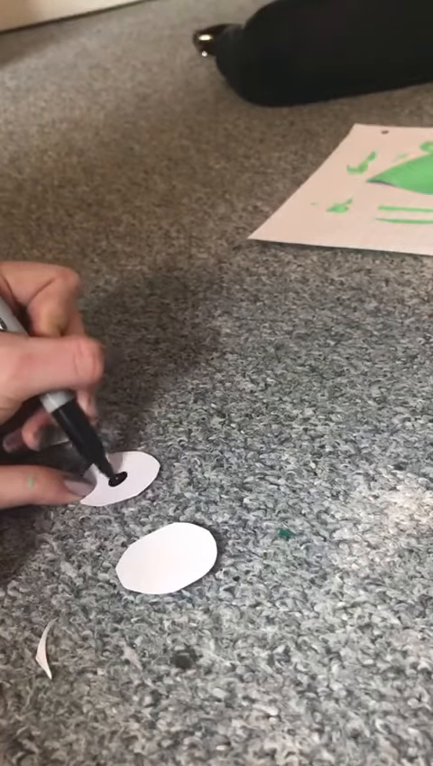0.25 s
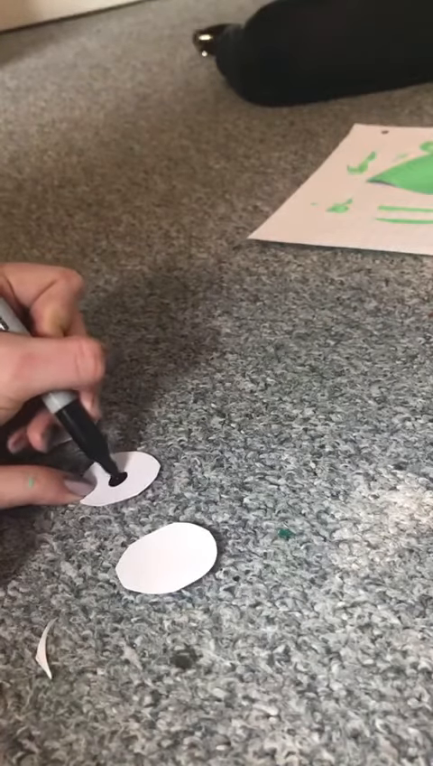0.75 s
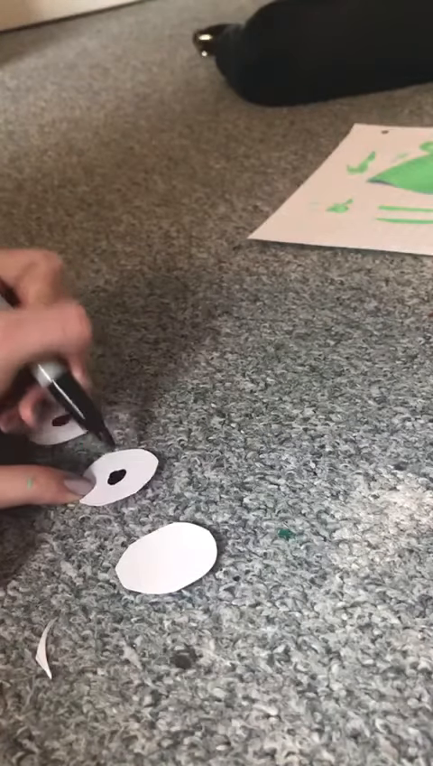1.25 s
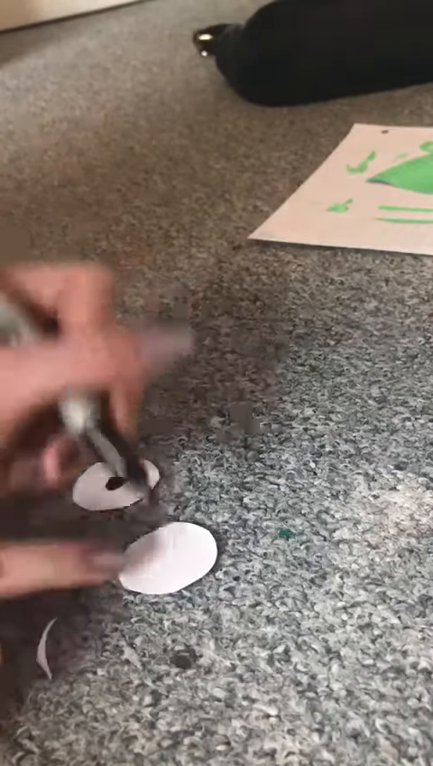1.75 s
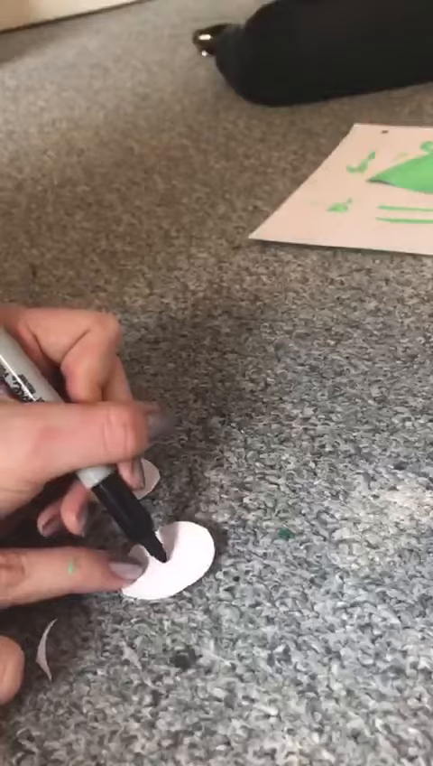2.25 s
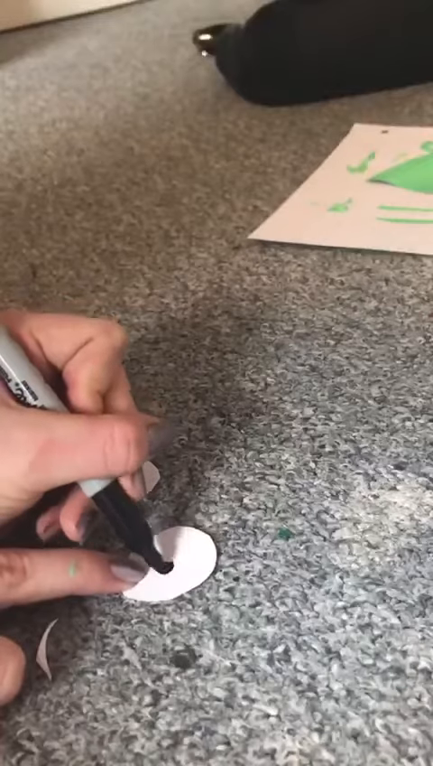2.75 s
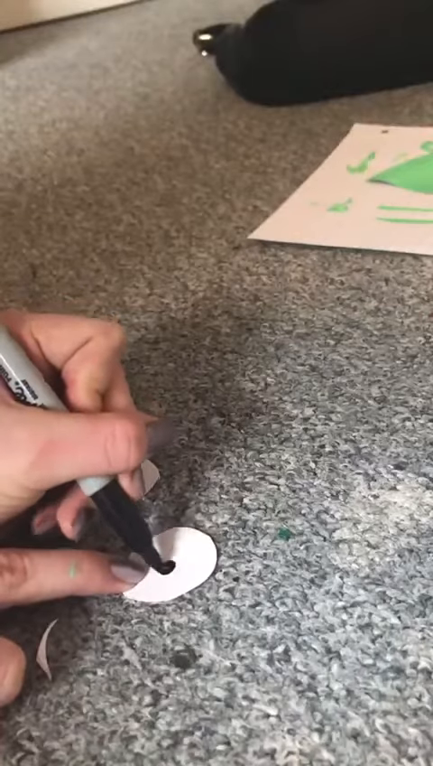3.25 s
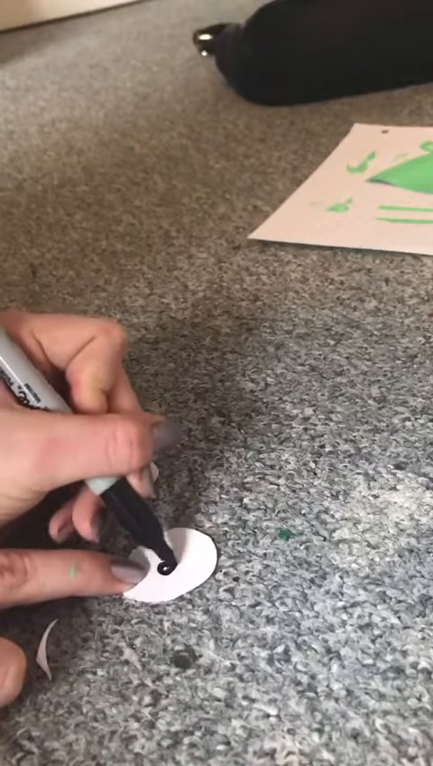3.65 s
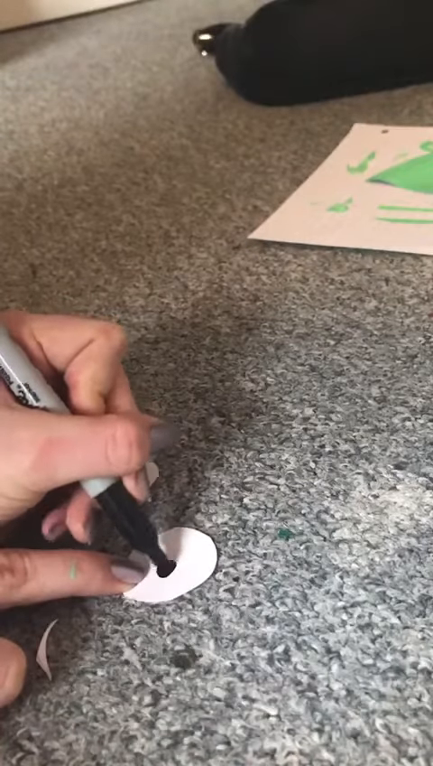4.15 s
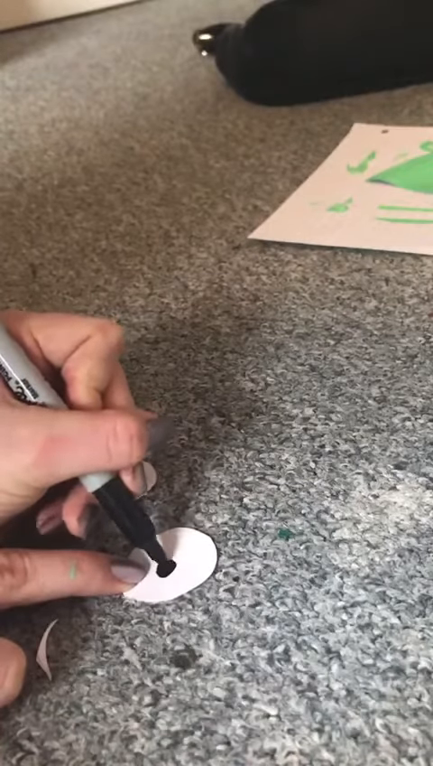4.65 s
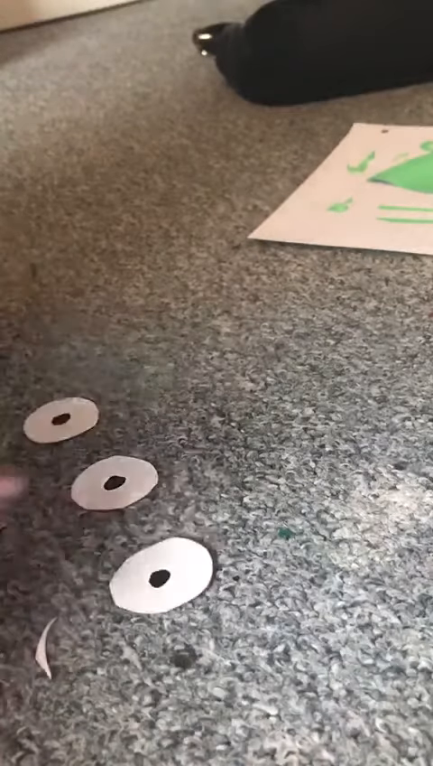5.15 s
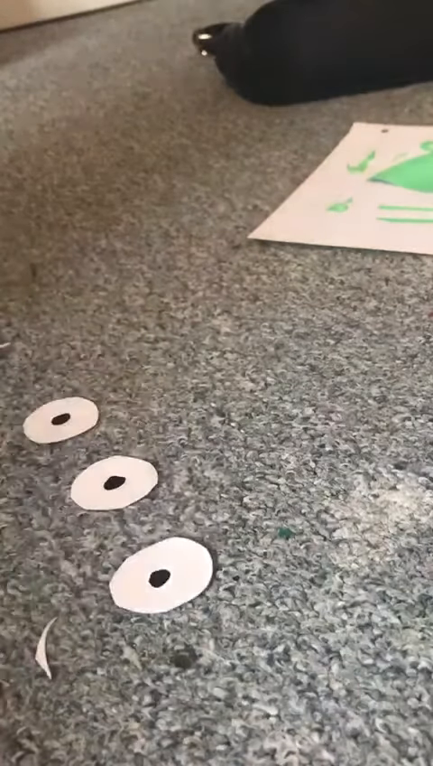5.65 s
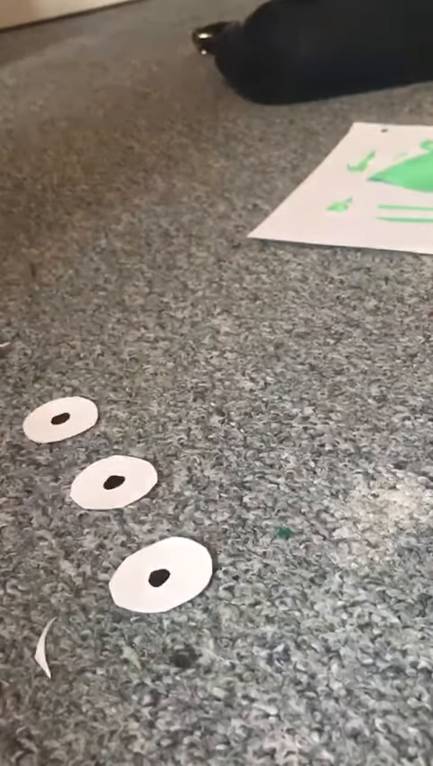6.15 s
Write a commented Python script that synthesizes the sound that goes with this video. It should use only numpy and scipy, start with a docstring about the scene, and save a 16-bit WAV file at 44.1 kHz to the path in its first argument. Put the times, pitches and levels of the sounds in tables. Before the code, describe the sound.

Soft, squeaky-dry marker rubs on small paper circles, a pause, more circular scribbling, then hand rustle and crisp pen clicks in a humming room.

```python
"""Fine, grainy rubs of a felt marker colouring small paper circles: quick flicks and round push-pull loops.
Each stroke swells three layers of fibre snaps (rub, scratch, hiss), whose resonances glide as the pen leans.
The hand brushes the carpet in noisy sweeps, a paper circle slides with a faint whistle, a few soft bumps
sound as damped modes, and plastic clicks near the end ring the pen's hollow and shell.
Mains hum and steady filtered noise fill the small room throughout."""
import sys
import numpy as np
from scipy import signal
from scipy.fft import rfft, irfft, next_fast_len
from scipy.io import wavfile
from scipy.ndimage import uniform_filter1d, map_coordinates

SR = 44100
rng = np.random.default_rng(int(sys.argv[2]) if len(sys.argv) > 2 else 0)


def wav_record(signal):
    """Record a signal, one row per channel, as 16-bit PCM in the file named by sys.argv[1]."""
    frames = np.transpose(np.atleast_2d(signal))
    bounded = np.clip(frames, -1, 1)
    # unit amplitude maps onto the largest positive 16-bit level
    quanta = np.round(bounded * 32767).astype(np.int16)
    wavfile.write(sys.argv[1], SR, quanta)


N = 281784

# Single flicks of the nib. Each row: start in seconds, length in seconds, relative level in dB,
# extra low rub in dB, extra high hiss in dB, direction from 0 = push to 1 = pull.
FLICKS = [(-0.03, 0.057, -56.5, -4, -1.5, 0.8), (0.033, 0.09, -57.5, 1, 4.5, 0.31),
          (0.127, 0.044, -59, -1, 5.5, 0.53), (0.166, 0.083, -59.5, 4.5, -2, 0.83),
          (0.254, 0.08, -57, 2, 4.5, 0), (0.338, 0.11, -60.5, 4, 1.5, 0.93),
          (0.466, 0.036, -59.5, 6.5, 5, 0), (0.509, 0.056, -60.5, 1, 3.5, 0.36),
          (0.575, 0.041, -69.5, 9.5, -2, 0), (0.631, 0.079, -63, 3, 4.5, 0.0085),
          (0.724, 0.033, -61, 3, 5, 0.38), (0.772, 0.049, -61.5, 1.5, -3.5, 0.49),
          (0.842, 0.042, -60, 1.5, 1, 0), (0.907, 0.037, -59.5, -2.5, 4, 0.2),
          (0.952, 0.06, -58, 0, -4, 0.6), (1.023, 0.044, -60, 3.5, -1, 0.32),
          (1.116, 0.024, -67, -2.5, 1.9, 0.43), (2.262, 0.009, -64, -11, -6, 0.88),
          (2.32, 0.055, -64.5, -4, -0.5, 0.33), (2.388, 0.042, -58, -6, -4.2, 0.31),
          (2.434, 0.13, -60.5, -0.5, 3.5, 0.98), (4.447, 0.05, -65, 5, 9, 1),
          (4.516, 0.036, -55.5, -8, 0, 0.3), (4.576, 0.057, -59, 0, 1, 0.1),
          (4.657, 0.027, -54.5, -13, -2, 0.36), (4.746, 0.0033, -61, -7, -4, 0.16)]
# Round loops, a push then a pull. Each row: start in seconds, push length in seconds,
# pull length in seconds, relative push level in dB, relative pull level in dB.
LOOPS = [(2.567, 0.12, 0.13, -56.9, -57.9), (2.807, 0.13, 0.11, -53.5, -57),
         (3.052, 0.13, 0.11, -53.5, -57.5), (3.301, 0.11, 0.13, -52, -55.5), (3.548, 0.12, 0.12, -52, -57),
         (3.793, 0.117, 0.119, -53.5, -56.5), (4.04, 0.094, 0.11, -53.5, -57.5),
         (4.251, 0.1, 0.085, -55.5, -59)]
# How each kind of stroke swells; the rows are rub, scratch, hiss. Each row: level in dB added to the stroke,
# crest as a share of the length, fall to the ends in dB, bluntness (1 = pointed, 3 = flat-topped).
PUSH = [(-5, 0.22, 15, 4.1), (2, 0.74, 9.8, 0.75), (4, 0.23, 9.9, 0.85)]
PULL = [(0, 0.56, 14.3, 2.68), (-2.5, 0.98, 0.76, 2.07), (1.5, 0.22, 7.3, 2.3)]  # columns as in PUSH
FLICK = [(-1.36, 0.81, 5.9, 2.3), (-0.21, 0.67, 3.4, 2.2), (1.24, 0.41, 5, 0.93)]  # columns as in PUSH
# Glide of the resonances as the pen leans; the rows are rub, scratch, hiss.
# Each row: shift at the start in octaves, shift at the end in octaves.
PUSH_LEAN = [(-0.07, 0.02), (-0.03, 0.04), (0.0, -0.01)]
PULL_LEAN = [(0.09, 0.09), (0.14, -0.14), (-0.05, 0.065)]  # columns as in PUSH_LEAN
TOUCH_S, LIFT_S = 0.005, 0.013  # the nib grips and lets go
TURN_S = 0.02  # the pen takes this long to lean the other way
# Colours of the rub and the scratch. Each row: frequency in Hz, relative level in dB.
RUB = [(450, -31), (780, -22.5), (1020, -5.5), (1370, -1), (1650, -7), (2100, -8.5), (2700, -22),
       (4000, -41)]
SCRATCH = [(1500, -20.5), (2400, -11), (2950, -3), (3450, 0), (3900, -3.5), (4800, -8.5), (6000, -15),
           (9000, -34)]
# Each paper circle hisses in its own colour. Each row: frequency in Hz, relative level in dB.
HISS_FIRST = [(3500, -23), (5100, -6), (6000, -8), (7000, -6), (7800, -5), (8750, 1), (9400, -5),
              (10200, -12), (11250, -4), (11900, -12.5), (12500, -25)]
HISS_SECOND = [(3500, -32), (5300, -7), (6400, -1.5), (7000, -2), (7650, -4.5), (8750, 2), (9500, -2.5),
               (10400, -9.5), (11250, -1), (11900, -11.5), (12500, -14)]
SECOND_CIRCLE_S = 1.7  # from here on the hiss takes the second colour
# Sweeps of hand and sleeve over the carpet. Each row: start in seconds, length in seconds,
# dull level in dB, bright level in dB.
SWEEPS = [(1.116, 0.31, -77.5, -73.5), (1.272, 0.015, -67, -66), (1.606, 0.38, -85, -78),
          (4.8, 0.31, -73, -69), (5.075, 0.49, -69, -75.5), (5.547, 0.39, -65.5, -69),
          (5.971, 0.044, -65, -67.5), (6.254, 0.24, -85, -74)]
SWEEP_CREST, SWEEP_FALL_DB, SWEEP_BLUNT = 0.22, 5.5, 1.82  # every sweep peaks early and tails off
SWEEP_EDGE_S = 0.038  # soft skin lands and leaves slowly
# The two colours of the carpet. Each row: frequency in Hz, relative level in dB.
BACKING = [(250, 2), (600, -0.5), (900, -0.5), (1400, -4.5), (2200, -5.5), (3000, -11), (6000, -36)]
PILE = [(1200, -18), (2600, -1.5), (4300, -2), (6300, -3.5), (8700, -5), (11300, -7), (12400, -28)]
# A paper circle slides from under the finger. One row: start in seconds, length in seconds, level in dB.
SLIDE = (1.165, 0.12, -75.5)
# Colour of its faint whistle. Each row: frequency in Hz, relative level in dB.
SLIDE_COLOUR = [(2000, -35), (2450, -8), (2650, 0), (2850, -8), (3500, -32)]
SLIDE_OCTAVES_PER_S = -0.7  # the whistle sinks as the paper slows
# Plastic clicks of cap and barrel. Each row: time in seconds, hollow ring level in dB, ring pitch in Hz,
# ring decay (t60) in seconds, shell level in dB.
CLICKS = [(4.976, -54, 5600, 0.015, -60), (5.256, -52.5, 4500, 0.014, -59),
          (5.8931, -22, 1992, 0.015, -37.5), (5.897, -46, 1636, 0.04, -49), (5.908, -39, 1950, 0.03, -66),
          (5.989, -48, 2000, .03, -51), (6.234, -56, 1960, 0.034, -56), (6.2638, -31, 2090, 0.0094, -36),
          (6.267, -58, 2120, 0.01, -41), (6.329, -54, 2010, 0.019, -47), (6.3620, -28.5, 1160, 0.0062, -37),
          (6.3659, -34.5, 2300, 0.014, -39)]
# Modes of the plastic shell. Each row: frequency in Hz, mean relative level in dB, decay (t60) in seconds.
SHELL = [(1270, -3.5, 0.0086), (2080, -2.5, 0.011), (3720, -6, 0.0071), (5780, -5, .006), (6600, -8, .005),
         (7900, -2, 0.0029), (9400, -10, 0.0052)]
# Soft bumps through the floor. Each row: time in seconds, level in dB, pitch in Hz, decay (t60) in seconds.
BUMPS = [(3.302, -44, 595.6, 0.028), (3.32, -53.5, 231, 0.1), (4.215, -45, 134.7, 0.11),
         (4.255, -47, 160.5, .14), (4.279, -60, 307.4, 0.093), (4.303, -42.5, 136, .12),
         (4.40, -51, 47.6, 0.5), (5.347, -50.5, 580, 0.05), (5.369, -46.5, 576, 0.025),
         (5.372, -60, 255, 0.13), (5.399, -51.5, 187, 0.081)]
# Course of the hum's level. Each row: time in seconds, mean level in dB.
HUM = [(0, -47), (4.18, -46), (4.262, -43), (4.29, -53), (4.35, -53.5), (4.399, -45.5), (6.39, -46)]
HUM_HZ = 100
# Partials of the hum. Each row: multiple of HUM_HZ, relative level in dB.
HUM_LINES = [(1, 0), (2, -19), (4, -36.5)]
# Colour of the steady room noise. Each row: frequency in Hz, relative level in dB.
AIR = [(20, -30), (32, -23), (44, 1), (70, 3.5), (110, -0.5), (170, -6.5), (250, -9), (400, -17),
       (600, -20), (850, -21.5), (2000, -27), (5000, -30), (10000, -32.5), (12400, -41)]
# Decay of the room. Each row: frequency in Hz, t60 in seconds.
ROOM = [(150, 0.43), (2000, 0.23), (5000, 0.15), (12000, 0.066)]
TOP_HZ = 12350  # band limit of the whole sound


def marker():
    """Friction swells with each stroke of the nib; its resonances glide as the pen leans."""
    t = np.arange(N) / SR
    rub, rub_glide = nib(axis=0)
    scratch, scratch_glide = nib(axis=1)
    hiss, hiss_glide = nib(axis=2)
    low = glided(coloured(fibres(rate=6000, spread_db=1), RUB), rub_glide)
    mid = glided(coloured(fibres(rate=9000, spread_db=2), SCRATCH), scratch_glide)
    snaps = fibres(rate=18000, spread_db=0)
    high = np.where(t < SECOND_CIRCLE_S, coloured(snaps, HISS_FIRST), coloured(snaps, HISS_SECOND))
    high = glided(high, hiss_glide)
    tooth = amp(0.5 * wobble(170))  # the grain of the paper shakes the whole nib
    uneven_rub = rub * low * amp(wobble(70))
    friction = tooth * (uneven_rub + scratch * mid + hiss * high)
    return patchy(friction, depth_db=1.8)


def strokes():
    """Every stroke in time order: (start, length, dB of rub, scratch and hiss, swell, lean)."""
    moves = []
    for start, length, db, rub_db, hiss_db, pull in FLICKS:
        lean = (1 - pull) * np.array(PUSH_LEAN) + pull * np.array(PULL_LEAN)
        moves.append((start, length, (db + rub_db, db, db + hiss_db), FLICK, lean))
    for start, push_s, pull_s, push_db, pull_db in LOOPS:
        moves.append((start, push_s, (push_db, push_db, push_db), PUSH, PUSH_LEAN))
        moves.append((start + push_s, pull_s, (pull_db, pull_db, pull_db), PULL, PULL_LEAN))
    return sorted(moves, key=lambda move: move[0])


def nib(axis):
    """Strength and glide (octaves) of one resonance through all strokes: 0 rub, 1 scratch, 2 hiss."""
    t = np.arange(N) / SR
    power, octaves = np.zeros(N), np.zeros(N)
    for start, length, levels_db, shapes, leans in strokes():
        db, crest, fall_db, blunt = shapes[axis]
        strength = amp(levels_db[axis] + db) * swell(length, crest, fall_db, blunt, TOUCH_S, LIFT_S)
        add(power, start, strength ** 2)  # overlapping strokes sum as power
        moving = slice(*np.searchsorted(t, [start, start + length]))
        octaves[moving] = np.interp(t[moving], [start, start + length], leans[axis])
    return np.sqrt(power), uniform_filter1d(octaves, int(TURN_S * SR))


def swell(length, crest, fall_db, blunt, touch_s, lift_s):
    """Envelope of one sliding contact: it grips, grows to a crest, slackens and lets go."""
    t = np.arange(int((length + lift_s) * SR)) / SR
    crest = np.clip(crest, 0.05, 0.95)
    off_crest = np.interp(t / length, [0, crest, 1], [1, 0, 1])
    contact = np.clip(np.minimum(t / touch_s, (t[-1] - t) / lift_s), 0, 1)
    return amp(-fall_db * off_crest ** blunt) * np.sqrt(contact)


def fibres(rate, spread_db):
    """Tiny snaps of fibres catching and letting go, rate a second, of uneven size."""
    caught = rng.random(N) < rate / SR
    return unit(caught * rng.standard_normal(N) * amp(spread_db * rng.standard_normal(N)))


def glided(x, octaves):
    """Shift the resonances of a steady sound up or down by reading it faster or slower."""
    return map_coordinates(x, [np.cumsum(2 ** octaves)], mode="mirror")


def patchy(x, depth_db):
    """Give a sound passing patches of colour, a few hundred Hz wide and a few hundredths of a second long."""
    z = signal.stft(x, nperseg=512)[2]
    patch = np.outer(np.hanning(8), np.hanning(12))  # frequency bins by time frames
    field = unit(signal.fftconvolve(rng.standard_normal(z.shape), patch, "same"))
    return signal.istft(z * unit(amp(depth_db * field)), nperseg=512)[1][:N]


def hand():
    """Skin and sleeve slide unevenly over the carpet's pile and backing."""
    dull, bright = np.zeros(N), np.zeros(N)
    for start, length, dull_db, bright_db in SWEEPS:
        sweep = swell(length, SWEEP_CREST, SWEEP_FALL_DB, SWEEP_BLUNT, SWEEP_EDGE_S, SWEEP_EDGE_S)
        add(dull, start, amp(dull_db) * sweep)
        add(bright, start, amp(bright_db) * sweep)
    dull *= amp(1.8 * wobble(35))
    bright *= amp(1.8 * wobble(35))
    backing = coloured(fibres(rate=5000, spread_db=0.5), BACKING)
    pile = coloured(fibres(rate=6500, spread_db=2.5), PILE)
    return dull * backing + bright * glided(pile, 0.1 * wobble(10))


def paper():
    """The finished circle slides a little over the carpet: narrow-band noise sinking in pitch."""
    start, length, db = SLIDE
    level = np.zeros(N)
    slide = swell(length, SWEEP_CREST, SWEEP_FALL_DB, SWEEP_BLUNT, SWEEP_EDGE_S, SWEEP_EDGE_S)
    add(level, start, amp(db) * slide)
    from_middle_s = np.clip(np.arange(N) / SR - start - length / 2, -length, length)
    whistle = coloured(rng.standard_normal(N), SLIDE_COLOUR)
    return level * glided(whistle, SLIDE_OCTAVES_PER_S * from_middle_s)


def cap():
    """Each click is a dry crack that rings a hollow of the pen and, briefly, its plastic shell."""
    out = np.zeros(N)
    t = np.arange(SR // 2) / SR
    for start, ring_db, hz, t60, shell_db in CLICKS:
        shell = np.zeros(len(t))
        for mode_hz, mode_db, mode_t60 in SHELL:
            # every click strikes the modes a little differently
            strength = amp(mode_db + rng.normal(0, 2)) * rng.choice([-1, 1])
            shell += strength * ring(mode_hz, mode_t60, attack=0.0001)
        crack = amp(-18 - 60 * t / 0.025) * rng.standard_normal(len(t))
        yielding = 1 - np.exp(-t / 0.0005)  # the plastic gives a little before it snaps
        hollow = amp(ring_db) * ring(hz, t60, attack=0.00043)
        add(out, start, hollow + amp(shell_db) * yielding * (shell + crack))
    return out


def bumps():
    """Dull, padded knocks: a damped mode inside a puff of noise around the same pitch."""
    out = np.zeros(N)
    t = np.arange(SR // 2) / SR
    for start, db, hz, t60 in BUMPS:
        around_pitch = [(hz / 2, -20), (hz * 0.7, -1), (hz * 1.3, 0), (hz * 3, -22)]  # (Hz, dB)
        puff = coloured(rng.standard_normal(N), around_pitch)[:len(t)]
        puff *= amp(-8 - 60 * t / (2 * t60)) * (1 - np.exp(-t / 0.004))
        add(out, start, amp(db) * (ring(hz, t60, attack=0.0013) + puff))
    return out


def ring(hz, t60, attack):
    """One damped mode with a soft start."""
    t = np.arange(SR // 2) / SR
    decay = np.exp(-np.log(1000) * t / t60)
    return np.sin(2 * np.pi * hz * t) * decay * (1 - np.exp(-t / attack))


def hum():
    """Twice the mains frequency with weak overtones; its level dips briefly once."""
    t = np.arange(N) / SR
    times, levels_db = np.transpose(HUM)
    phase = 2 * np.pi * HUM_HZ * t + 0.035 * wobble(5.9)
    lines = np.zeros(N)
    for multiple, db in HUM_LINES:
        lines += amp(db) * np.sin(multiple * phase + rng.uniform(0, 2 * np.pi))
    waver_db = 0.35 * wobble(14)
    return amp(np.interp(t, times, levels_db) + waver_db) * unit(lines)


def air():
    """Steady room noise: random noise filtered to the room's colour."""
    return amp(-62.5) * coloured(rng.standard_normal(N), AIR)


def room(x, wet_db):
    """The small room's tail, dying faster in the treble."""
    hz, t, z = signal.stft(rng.standard_normal(SR // 2), SR, nperseg=256)
    fade = amp(-60 * t / along(ROOM, hz)[:, None])
    tail = signal.istft(z * fade, SR, nperseg=256)[1]
    tail = np.pad(tail / np.linalg.norm(tail), (SR // 250, 0))  # the tail starts 4 ms late
    return x + amp(wet_db) * signal.fftconvolve(x, tail)[:N]


def amp(db):
    """Decibels to gain."""
    return 10 ** (np.asarray(db) / 20)


def unit(x):
    """Scale to rms 1."""
    return x / np.sqrt(np.mean(x ** 2) + 1e-20)


def along(points, hz):
    """Read (Hz, value) points on a log axis."""
    f, v = np.transpose(points)
    return np.interp(np.log(hz + 1), np.log(f + 1), v)


def wobble(rate):
    """A smooth random curve, rate knots a second."""
    knots = rng.standard_normal(int(N * rate / SR) + 4)
    return map_coordinates(knots, [np.arange(N) * rate / SR])


def filtered(x, response):
    """x times a response of frequency."""
    size = next_fast_len(N + 8192)
    return irfft(rfft(x, size) * response(np.fft.rfftfreq(size, 1 / SR)), size)[:N]


def coloured(x, spectrum):
    """x filtered by the given colour, at rms 1."""
    return unit(filtered(x, lambda hz: amp(along(spectrum, hz))))


def add(track, start, sound):
    """Mix a sound into the track at a time in seconds, cutting what falls outside."""
    first = round(start * SR)
    sound = sound[max(-first, 0):]
    part = track[max(first, 0):][:len(sound)]
    part += sound[:len(part)]


def scene():
    """Pen, clicks, bumps, hand and paper over the hum and the air of the room."""
    pen = room(marker(), wet_db=-20)
    knocks = room(cap(), wet_db=-12.5) + room(bumps(), wet_db=-9.5)
    return (pen + knocks + hand() + paper() + hum() + air())[None]


def record(dry):
    """Nothing is kept above the band limit."""
    return filtered(dry[0], lambda hz: hz < TOP_HZ)[None]


dry = scene()
out = record(dry)
wav_record(out)
```